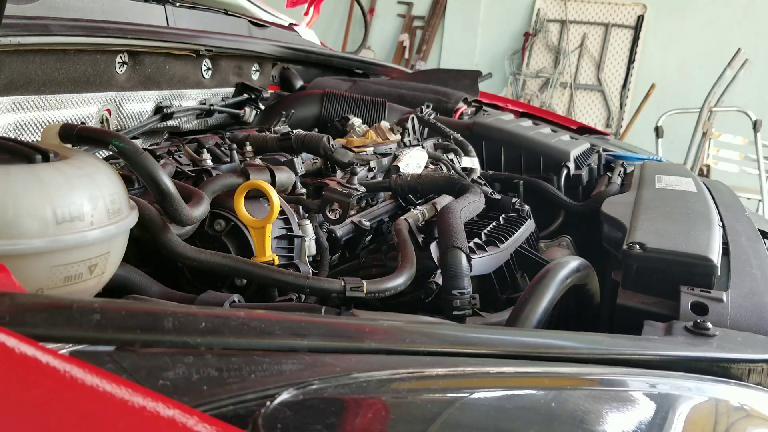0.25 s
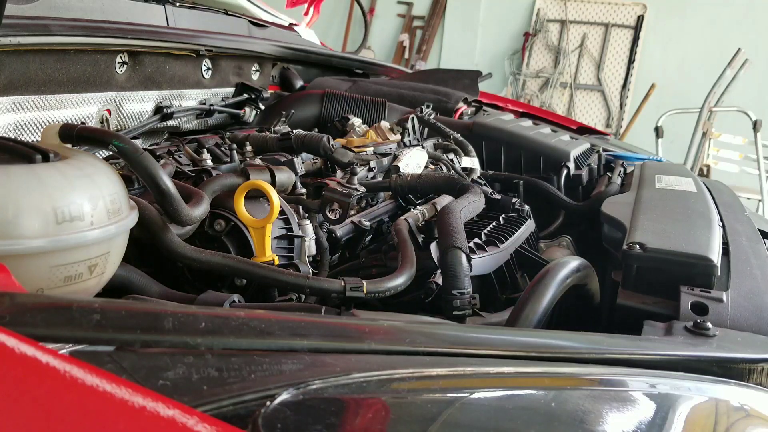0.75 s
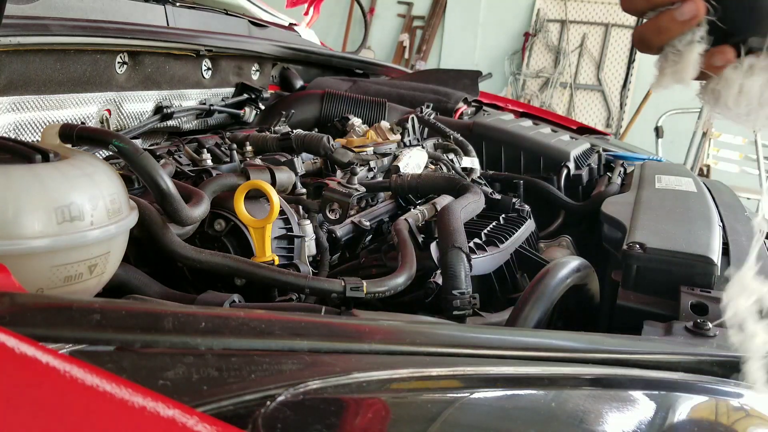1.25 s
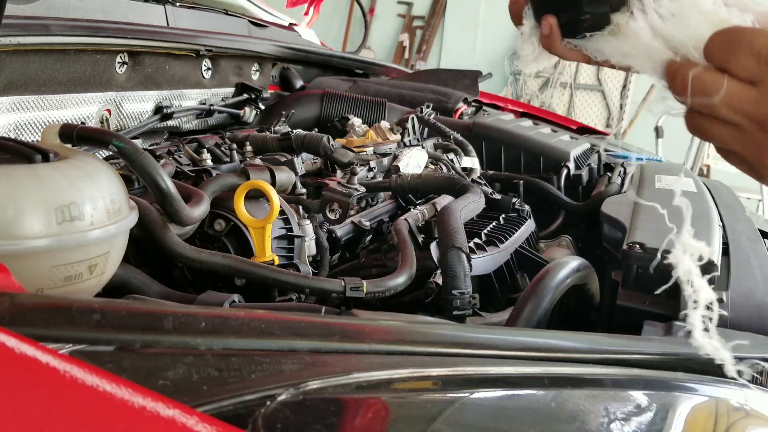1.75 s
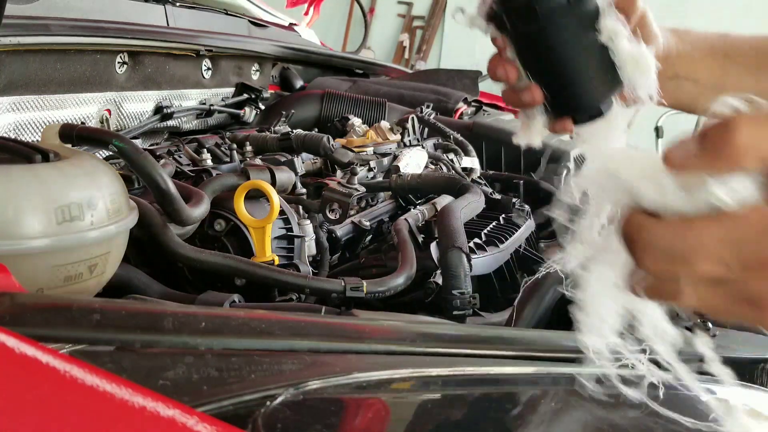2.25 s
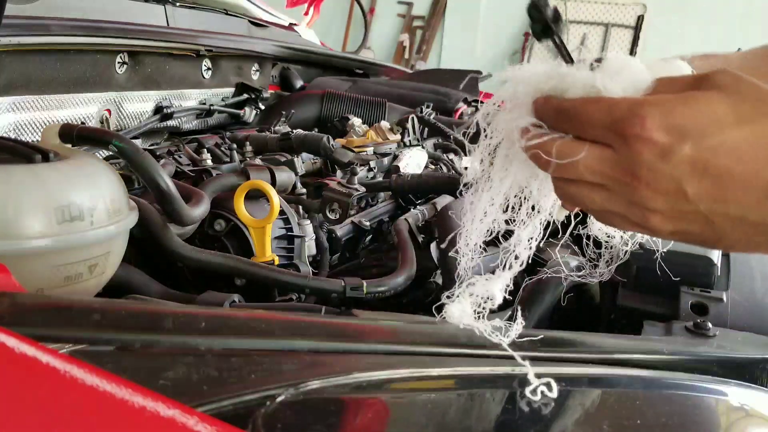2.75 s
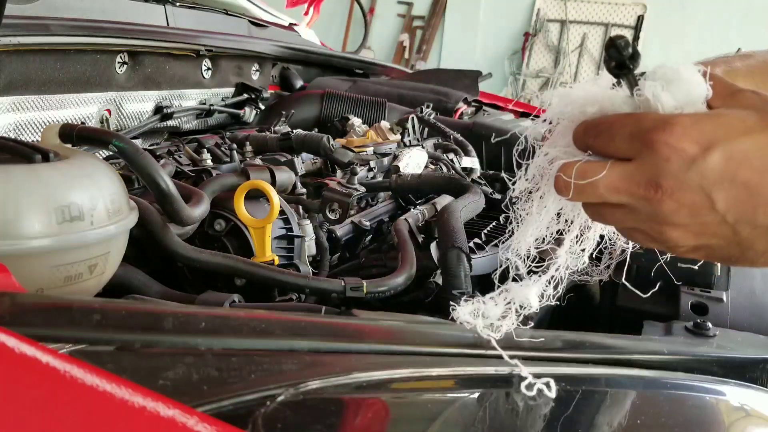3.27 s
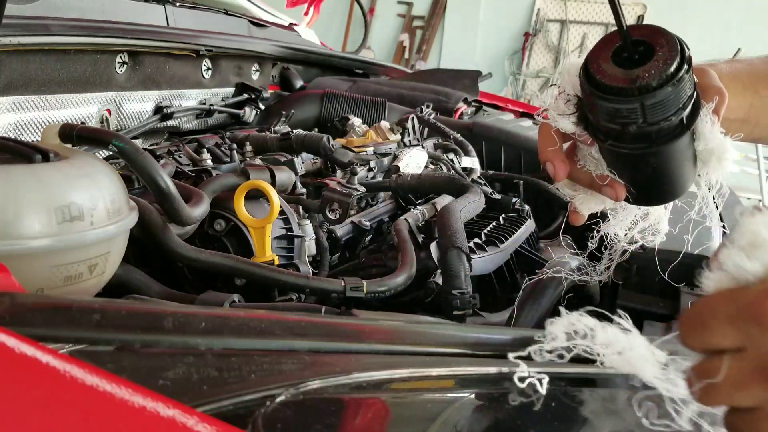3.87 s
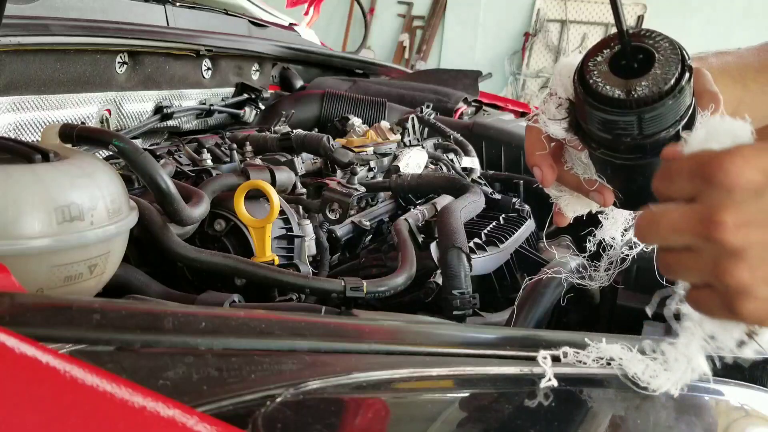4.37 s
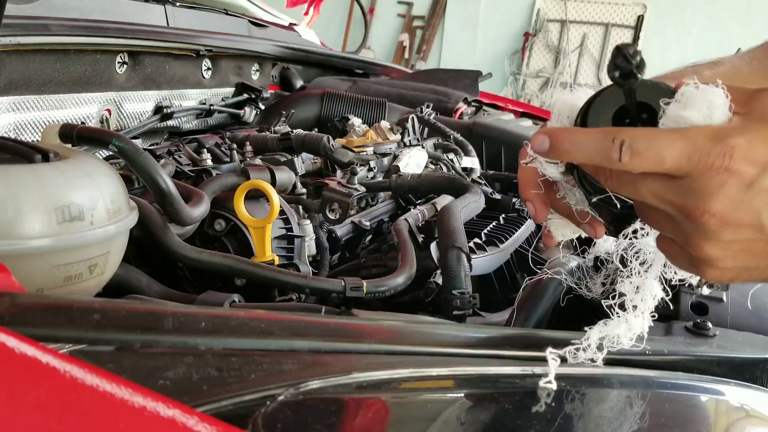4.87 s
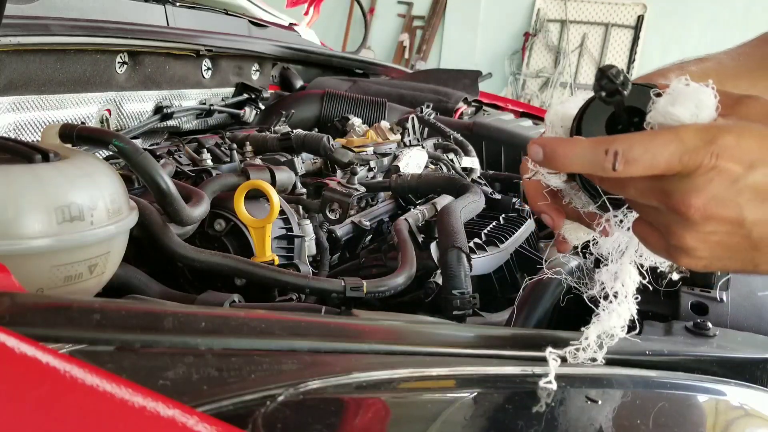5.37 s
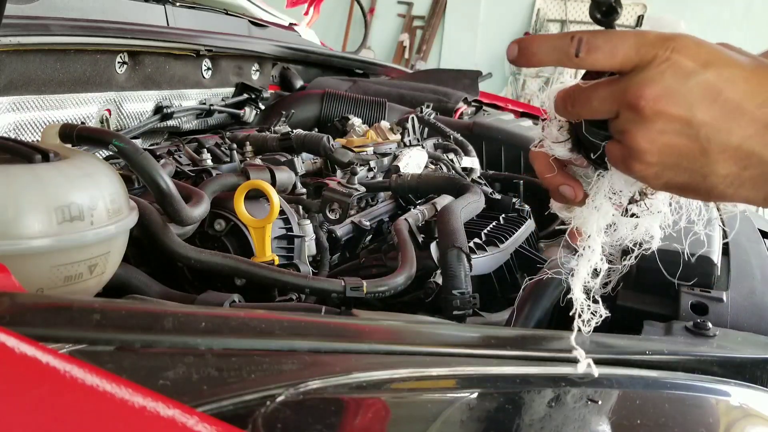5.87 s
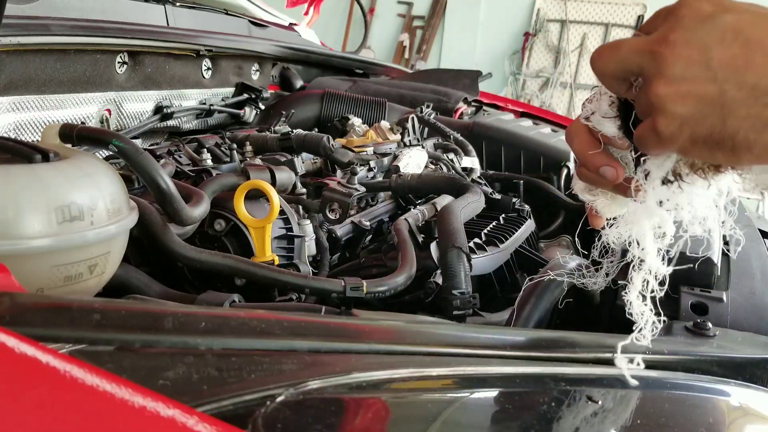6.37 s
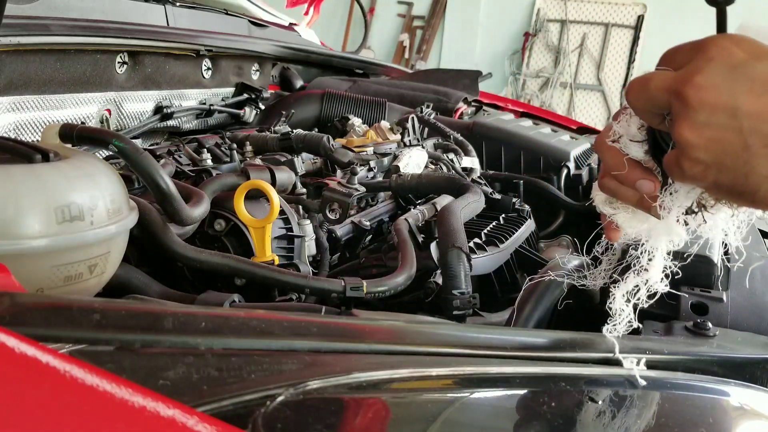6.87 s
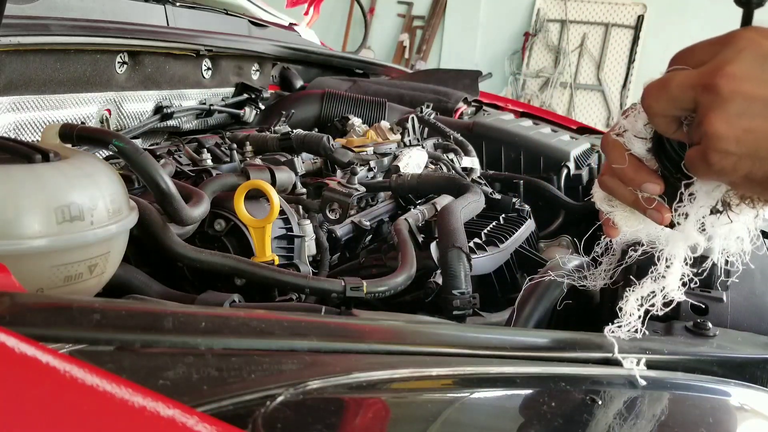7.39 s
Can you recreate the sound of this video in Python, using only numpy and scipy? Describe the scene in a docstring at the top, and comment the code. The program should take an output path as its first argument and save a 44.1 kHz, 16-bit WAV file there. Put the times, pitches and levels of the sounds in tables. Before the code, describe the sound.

A stationary microphone beside hands working with a plastic part and a rag in a hard-walled garage. Outside, a V8 exhaust rises in pitch, drops sharply as the throttle closes, and burbles closer. Tyre noise, fan whirr and hiss brighten as it goes by, followed by a short tailpipe drone, then quick muffling and a faint low remnant. Light ticks and cloth swishes are clearest early and late, with very faint birds.

```python
"""Outside an open garage, a V8 vehicle pulls up the street, lifts off, burbles past and rolls away.
The exhaust is a sum of tones at multiples of the engine cycle, with noise for the rush of gas.
Tyre and air noise swell and brighten as it passes; the garage booms with the far exhaust.
Near the listener, hands turn a plastic part in a rag, made of short noise bursts with an echo.
Faint birds chirp outside as gliding whistles, over the steady noise of the street."""
import sys
import numpy as np
from scipy import signal
from scipy.fft import rfft, irfft, next_fast_len
from scipy.io import wavfile
from scipy.ndimage import uniform_filter1d

SR = 44100
rng = np.random.default_rng(int(sys.argv[2]) if len(sys.argv) > 2 else 0)


def log_audio(samples):
    """Write samples as a 16-bit WAV file to the path given in sys.argv[1]."""
    # one column per channel
    frames = np.atleast_2d(samples).T
    # limit to full scale, then quantise
    limited = np.clip(frames, -1, 1)
    pcm = np.round(limited * 32767).astype(np.int16)
    wavfile.write(sys.argv[1], SR, pcm)


N = 336483
TIME = np.arange(N) / SR  # seconds

# Engine speed. Each row: time in seconds, four-stroke cycles a second.
ENGINE_SPEED = [(0.0, 13.51), (1.0, 16.7), (1.45, 17.93), (1.95, 18.11), (2.45, 12.97), (3.38, 13.19),
                (3.95, 12.17), (4.31, 12.34), (4.5, 11.71), (4.95, 11.5), (5.25, 10.71), (6.33, 8.98),
                (6.78, 9.7), (7.12, 9.55), (7.63, 9.9)]
# Level of the burble, the low exhaust tones together. Each row: time in seconds, level in dB.
BURBLE_LEVEL = [(0, -26), (1.1, -26), (1.9, -29.5), (2.15, -24), (2.5, -21), (2.8, -17.5), (3.05, -18.5),
                (3.8, -17), (4.35, -13), (4.8, -15), (5.1, -22), (5.5, -24.5), (5.75, -30), (6.2, -30),
                (6.5, -32.5), (7.15, -32.5), (7.45, -28.5), (7.63, -31)]


def gain_of(db):
    """Turns decibels into a factor for the amplitude."""
    return 10 ** (np.asarray(db) / 20)


def evened(x):
    """Scales a signal to an rms (average strength) of one."""
    return x / np.sqrt(np.mean(abs(x) ** 2) + 1e-20)


def curve(rows, column=1, at=TIME):
    """Draws straight lines over time through one column of a table."""
    rows = np.array(rows, float)
    return np.interp(at, rows[:, 0], rows[:, column])


def colour(points, hz):
    """Reads the gain of a spectrum, given as points in Hz and dB, at any frequencies."""
    point_hz, db = np.transpose(points)
    return gain_of(np.interp(np.log(hz + 1), np.log(point_hz), db))


def peaks(modes, hz):
    """Gives the gain of a few resonances, each with a centre in Hz, a width in Hz and a level in dB."""
    power = sum(gain_of(db) ** 2 / (1 + ((hz - centre) / width) ** 2) ** 2 for centre, width, db in modes)
    return np.sqrt(power)


def noise(shape):
    """Makes noise of rms one whose spectrum follows the function shape."""
    size = next_fast_len(N)
    spectrum = rfft(rng.standard_normal(size))
    hz = np.fft.rfftfreq(size, 1 / SR)
    return evened(irfft(spectrum * shape(hz), size)[:N])


def band(points):
    """Makes noise from a table of Hz and dB that falls away steeply past its ends."""
    lowest, highest = points[0][0], points[-1][0]

    def shape(hz):
        below = np.minimum(hz / lowest, 1) ** 2
        above = np.minimum(highest / (hz + 1), 1) ** 2
        return colour(points, hz) * below * above
    return noise(shape)


def add(mix, s, sound):
    """Mixes a sound in at time s."""
    part = mix[max(round(s * SR), 0):][:len(sound)]
    part += sound[:len(part)]


def street():
    """Steady wash of the street: noise, strongest in the bass."""
    # Each row: frequency in Hz, relative level in dB.
    wash_colour = [(25, -16), (55, -1), (80, -8), (125, 2.5), (170, 5), (220, -20), (280, -17),
                   (330, -15.5), (430, -24.5), (680, -27), (1100, -29), (1800, -45.5), (3700, -41),
                   (8300, -57), (15000, -58.5)]
    level_db = -42.5
    return gain_of(level_db) * band(wash_colour)


def birds():
    """Far birds: short whistles whose pitch glides and wavers."""
    # Each row: start in seconds, length in seconds, level in dB, pitch at start in Hz, pitch at end in Hz.
    # The pitches are those before the waver.
    chirps = [(0.362, 0.075, -66, 4900, 4670), (1.28, .08, -72, 4500, 4900), (5.66, 0.077, -65, 4900, 4170),
              (6.638, 0.047, -68, 4700, 4860), (6.695, 0.078, -71, 4000, 4500),
              (6.775, 0.032, -61.5, 3200, 3720), (6.785, 0.036, -66, 4400, 4660),
              (7.08, 0.05, -65, 4650, 4300), (7.118, 0.064, -65, 3630, 3870), (7.2, 0.047, -68, 3730, 3500),
              (7.47, 0.092, -74, 3880, 4540)]
    out = np.zeros(N)
    for s, length, db, start, end in chirps:
        count = round(length * SR)
        waver = 1 + .05 * evened(uniform_filter1d(rng.standard_normal(count), 40))
        hz = np.linspace(start, end, count) * waver
        whistle = np.sqrt(2) * np.sin(2 * np.pi * np.cumsum(hz) / SR)
        add(out, s, gain_of(db) * whistle * signal.windows.tukey(count, .6))
    return out


def walls(x, t60):
    """Diffuse echo of hard walls: a noise tail that falls 60 dB in t60 seconds."""
    t = np.arange(SR // 2) / SR
    tail = rng.standard_normal(len(t)) * gain_of(-60 * t / t60)
    return signal.oaconvolve(x, tail / np.linalg.norm(tail))[:N]


def hands():
    """Plastic ticks are quickly fading noise; the rag's swish is noise with a grainy level."""
    # Ticks of the plastic part. Each row: start in seconds, level in dB.
    ticks = [(.715, -54), (5.708, -59), (5.718, -59), (5.903, -58), (6.057, -60), (6.094, -54),
             (6.103, -58), (6.126, -57), (6.538, -65), (7.085, -61), (7.099, -57), (7.224, -64),
             (7.526, -57)]
    # Tone of the ticks. Each row: frequency in Hz, relative level in dB.
    tick_colour = [(1200, -12.5), (2500, 1), (4200, -1.5), (7300, 0), (9500, -14), (11500, -8),
                   (14000, -13)]
    # Rubs of the rag. Each row: start in seconds, length in seconds, level in dB, centre in Hz, width in Hz.
    rubs = [(0.646, 0.16, -63.5, 6500, 3940), (0.676, 0.084, -64, 12100, 4050),
            (0.717, 0.33, -68.5, 12300, 1770), (1.867, 0.21, -71.5, 12500, 4850),
            (2.48, 0.21, -74, 13000, 2000), (5.14, .2, -72.5, 9500, 7000), (6.16, 0.3, -72.5, 5770, 3500),
            (7.012, 0.16, -69.5, 5400, 3500), (7.425, 0.22, -69.5, 4300, 3000),
            (6.618, .34, -82, 4200, 2400)]
    out, t = np.zeros(N), np.arange(2000) / SR
    crack = band(tick_colour)
    for s, db in ticks:
        fade = gain_of(db - 60 * t / .03)  # falls 60 dB in 0.03 s
        add(out, s, fade * crack[round(s * SR):][:len(t)])
    for s, length, db, centre, width in rubs:
        count = round(length * SR)
        fibres = noise(lambda hz: peaks([(centre, width / 2, 0)], hz))[:count]
        grain_db = 2.3 * evened(uniform_filter1d(rng.standard_normal(count), 160))
        swish = evened(fibres * gain_of(grain_db))
        add(out, s, gain_of(db) * swish * signal.windows.tukey(count, .7))
    return out


def passing(closest_db, doubling_db, hidden_db, hidden_s, hiding_s, at=TIME):
    """Level in dB of something that drives past the door and then slips out of view."""
    closest_s, distance_m, drive_m_per_s = 4.35, 5.94, 5.52
    shadow_db_per_s = 1.5  # the wall's shadow keeps deepening once out of view
    distance = np.hypot(distance_m, drive_m_per_s * (at - closest_s))
    hidden = .5 + .5 * np.tanh((at - hidden_s) / (2 * hiding_s))
    shadow_db = hidden_db * hidden + shadow_db_per_s * np.maximum(at - hidden_s, 0)
    return closest_db - doubling_db * np.log2(distance / distance_m) - shadow_db


def whirr():
    """Fan and belts, thrown forward: noise through resonances that drops once the front has passed."""
    # Each row: resonance in Hz, width in Hz, relative level in dB.
    whirr_modes = [(990, 50, 1.5), (1600, 60, -2), (2130, 110, -9), (2350, 110, 0), (2615, 41, -2.5),
                   (2750, 60, -8.5), (3500, 70, -14), (3600, 130, -14), (4380, 110, -12)]
    # Level in dB when closest, dB lost per doubling of distance, dB lost once the front has passed,
    # time of that in seconds, seconds that this takes.
    whirr_pass = (-50.3, 5.8, 24, 4, .17)
    return gain_of(passing(*whirr_pass)) * noise(lambda hz: peaks(whirr_modes, hz))


def tyre_roar():
    """Tyre noise that grows with road speed and as the vehicle comes near."""
    # Each row: frequency in Hz, relative level in dB.
    roar_colour = [(200, -18.5), (330, 4), (500, -1.5), (680, 1), (1000, -5.5), (1170, -10), (1450, -10.5),
                   (1850, -15.5), (2600, -24.5), (4000, -27.5)]
    # At full road speed: level in dB when closest, dB lost per doubling of distance, dB lost out of view,
    # time it leaves view in seconds, seconds that this takes.
    roar_pass = (-40.2, 4.7, 12.5, 5.2, .12)
    tyre_db = 18  # dB per doubling of road speed
    rolling = np.maximum.accumulate(curve(ENGINE_SPEED))  # road speed follows the revs up, then holds
    speed_db = tyre_db * np.log2(rolling / rolling[-1])
    return gain_of(passing(*roar_pass) + speed_db) * band(roar_colour)


def hiss():
    """Tyre and air hiss; the door frame shades its top treble more when the vehicle is far or hidden."""
    # Each row: frequency in Hz, relative level in dB.
    hiss_colour = [(1200, -26), (2050, 2), (2900, -1), (3250, -3), (3700, -1), (5000, -5), (7000, -8.5),
                   (8700, -15), (11500, -10.5), (15500, -16.5)]
    # Level in dB when closest, dB lost per doubling of distance, dB lost out of view,
    # time it leaves view in seconds, seconds that this takes.
    hiss_pass = (-52, 5.5, 12.3, 5.23, .13)
    # Gain of the top treble, with the same five entries.
    treble_pass = (-1.1, 7, 5, 5.15, .1)
    air = band(hiss_colour)
    hz = np.fft.rfftfreq(N, 1 / SR)
    top = irfft(rfft(air) / (1 + (7000 / (hz + 1)) ** 6), N)  # the part above about 7 kHz
    shaded = air + (gain_of(passing(*treble_pass)) - 1) * top
    return gain_of(passing(*hiss_pass)) * shaded


def rumble():
    """Turbulent exhaust gas: noise that fills in between the tones, most under load."""
    # Each row: frequency in Hz, relative level in dB.
    gas_colour = [(42, -26.0), (60, -10.5), (110, -1), (155, -1.5), (185, -3), (210, -4.5),
                  (245, -9.5), (320, -23.5)]
    load_db = np.interp(TIME, [2.3, 2.8], [-10, -15.5])
    return gain_of(curve(BURBLE_LEVEL) + load_db) * band(gas_colour)


def order_tone(k, turns, slow_t, height, rough, scatter):
    """One engine order, a tone at k times the cycle, whose strength and phase vary by chance."""
    a, b = rng.standard_normal((2, len(slow_t)))
    chance = evened(np.convolve(a + 1j * b, np.hanning(41), "same"))
    steady = np.exp(1j * scatter * rng.uniform(-1, 1))
    swing = height * (steady + rough * chance) / np.sqrt(1 + rough ** 2)
    angle = 2 * np.pi * k * turns
    cosine = np.interp(TIME, slow_t, swing.imag) * np.cos(angle)
    sine = np.interp(TIME, slow_t, swing.real) * np.sin(angle)
    return cosine + sine


def fading(count, t):
    """As the vehicle moves, its shifting echoes make each low order wander in level, in dB."""
    fading_db, fading_s = 3.5, .4
    knots = np.arange(0, t[-1] + fading_s, fading_s / 2)
    wander = rng.standard_normal((count, len(knots)))
    return fading_db * np.array([np.interp(t, knots, row) for row in wander])


def rasp(turns, t, speed, pulling):
    """The upper orders are uneven in strength and slide through the pipe's resonances."""
    # Each row: frequency in Hz, relative level in dB.
    rasp_colour = [(200, -26), (240, 1.5), (275, 1.5), (310, -14.5), (365, 3.5), (420, 2.5), (470, -6),
                   (600, -21)]
    # Orders stronger or weaker than their neighbours. Each row: multiple of the cycle, level change in dB.
    uneven_orders = [(21, 3), (24, 8), (25, -2), (27, 4.5), (29, 1), (30, 3.5), (31, 2)]
    # Without throttle: level in dB when closest, dB lost per doubling of distance, dB lost out of view,
    # time it leaves view in seconds, seconds that this takes.
    rasp_pass = (-34.5, 5, 17, 5.5, 0.48)
    pulling_db = 0.5  # added under throttle
    upper = np.arange(18, 46)
    change_db = {round(k): db for k, db in uneven_orders}
    heights = colour(rasp_colour, upper[:, None] * speed)
    heights = heights * gain_of([[change_db.get(k, 0)] for k in upper])
    level_db = passing(*rasp_pass, at=t) + pulling_db * pulling
    heights = heights / np.linalg.norm(heights, axis=0) * gain_of(level_db)
    return sum(order_tone(k, turns, t, h, rough=1.1, scatter=np.pi) for k, h in zip(upper, heights))


def drone(turns, t):
    """Silencer tones build as the tailpipe turns to the door and are cut off ever faster behind the wall."""
    # Each row: multiple of the cycle, relative level in dB.
    drone_orders = [(23, -12), (25, -9), (26, -12), (29, -13), (30, -0.5), (32, -13), (35, -9)]
    loudest_s, loudest_db, rise_db_per_s = 4.85, -27.5, 16.5
    fall_s = 0.26  # seconds to fall 10 dB
    roughness = .33  # 0 = a clean tone
    before, after = np.maximum(loudest_s - t, 0), np.maximum(t - loudest_s, 0)
    level = gain_of(loudest_db - rise_db_per_s * before - 10 * (after / fall_s) ** 2)
    return sum(order_tone(round(k), turns, t, gain_of(db) * level, rough=roughness, scatter=np.pi)
               for k, db in drone_orders)


def lope_db(t, speed, pulling):
    """Level of the lope of the uneven cylinder banks; under throttle it starts weak and grows with the revs."""
    # Without throttle: level in dB when closest, dB lost per doubling of distance, dB lost out of view,
    # time it leaves view in seconds, seconds that this takes.
    lope_pass = (-31, 0, 27, 5.85, .17)
    base_revs, base_db, db_per_rev = 15.2, -8, 3.1  # cycles a second, dB there, dB per cycle a second
    return passing(*lope_pass, at=t) + pulling * (base_db + db_per_rev * (speed - base_revs))


def exhaust():
    """Tones at multiples of the engine cycle; alongside they line up into one throb a cycle."""
    # Driving state. Each row: time in seconds, state (0 pulling, 1 coasting, 2 alongside, 3 leaving, 4 far).
    driving_state = [(0, 0), (2.1, 0), (2.45, 1), (3.55, 1), (4.15, 2), (5, 2), (5.3, 3), (5.75, 3),
                     (6.15, 4), (7.63, 4)]
    # Balance of the low orders. Each row: multiple of the cycle, then relative level in dB
    # when pulling, coasting, alongside, leaving.
    order_balance = [(3, -5.5, -29.5, -19, -9), (4, -15.5, -35, -20, -27), (6, -3.5, -20, -16.5, -25),
                     (7, 0.5, -8.5, -26, -2.5), (9, 2.5, -2, -29, -28), (10, -3.5, -0.5, -1, 2),
                     (11, -1, -1.5, -21.5, -8), (12, -13.5, -2.5, -2.5, -1.5), (13, -7.5, -15.5, 4.5, 5),
                     (14, -9, -14.5, -12, -4.5), (15, -5.5, -4.5, -1, -4), (16, -9, -10.5, -3, -16.5),
                     (17, -16.5, -8, -13, -12), (18, -20.5, -26, -40, -23), (19, -23, -18, -30.5, -18.5),
                     (20, -22.5, -10, -34, -34), (21, -27, -13, -38, -25), (23, -35, -43, -25, -3)]
    # Resonances of the garage's air. Each row: frequency in Hz, width in Hz, relative level in dB.
    garage_modes = [(52.3, 13, -4), (110.3, 7.2, 15), (144, 3.8, 9), (182, 13, -16), (235, 25, -23.5)]
    # The tailpipe's resonance and the loss of deep bass. Each row: frequency in Hz, relative level in dB.
    pipe_colour = [(30, -11), (42, -14.5), (55, 1.5), (100, 0), (150, 2.5), (180, 1), (208, 7.5),
                   (228, -3.5), (250, -6.5), (300, 0)]
    # Firing note, eight pulses a cycle. Each row: time in seconds, level in dB.
    firing_level = [(0, -24), (.33, -18.5), (.44, -27), (.58, -17), (1.1, -18), (1.2, -12), (1.5, -11.5),
                    (1.59, -18), (1.67, -12), (2.24, -11), (2.32, -21.5), (2.65, -25), (2.92, -15.5),
                    (3.13, -30.5), (3.3, -15), (3.45, -21), (3.9, -14), (4.35, -20), (4.7, -32), (6, -57)]

    t = np.arange(0, TIME[-1] + .005, .005)  # slow clock, 5 ms steps
    turns = np.cumsum(curve(ENGINE_SPEED)) / SR - .38  # engine cycles so far
    speed, state = curve(ENGINE_SPEED, at=t), curve(driving_state, at=t)
    # how much of each state applies; neighbouring states blend
    share = np.maximum(1 - abs(state - np.arange(5)[:, None]), 0)
    pulling = share[0]
    # roughness and phase scatter (radians) for each driving state
    rough = np.array([.55, .45, .23, .36, .65]) @ share
    scatter = np.array([2.8, 2.3, .8, 1.1, 2.2]) @ share

    table = np.array(order_balance)
    multiples = np.round(table[:, 0])
    order_hz = multiples[:, None] * speed
    # from far away the orders that meet a garage resonance stand out
    heights = gain_of(table[:, 1:]) @ share[:-1] + share[-1] * peaks(garage_modes, order_hz)
    heights = heights * colour(pipe_colour, order_hz) * gain_of(fading(len(multiples), t))
    # only the balance is kept; the burble sets the level
    heights = heights / np.linalg.norm(heights, axis=0) * gain_of(curve(BURBLE_LEVEL, at=t))
    out = sum(order_tone(k, turns, t, h, rough, scatter) for k, h in zip(multiples, heights))

    firing_height = gain_of(curve(firing_level, at=t))
    out += order_tone(8, turns, t, firing_height, rough=0.042, scatter=0.94)
    lope_height = gain_of(lope_db(t, speed, pulling))
    out += order_tone(5, turns, t, lope_height, rough=0.39, scatter=1)  # five a cycle
    out += drone(turns, t)
    return out + rasp(turns, t, speed, pulling)


def scene():
    """Adds up the street, the passing vehicle and the work by hand, with echoes of the hands and birds."""
    near = hands()
    near_echo = gain_of(-7) * walls(near, t60=.35)
    far_birds = gain_of(-.5) * walls(birds(), t60=.45)  # heard only as echo
    road = tyre_roar() + hiss() + whirr()
    vehicle = exhaust() + rumble() + road
    return (vehicle + street() + near + near_echo + far_birds)[None]


def record(dry):
    """Softens both ends and removes the treble above the band limit."""
    edge_hz = 15700
    ends = signal.windows.tukey(N, .003)
    low_pass = signal.firwin(511, edge_hz, window=("kaiser", 9), fs=SR)
    return signal.oaconvolve(dry * ends, low_pass[None], "same")


dry = scene()
out = record(dry)
log_audio(out)
```